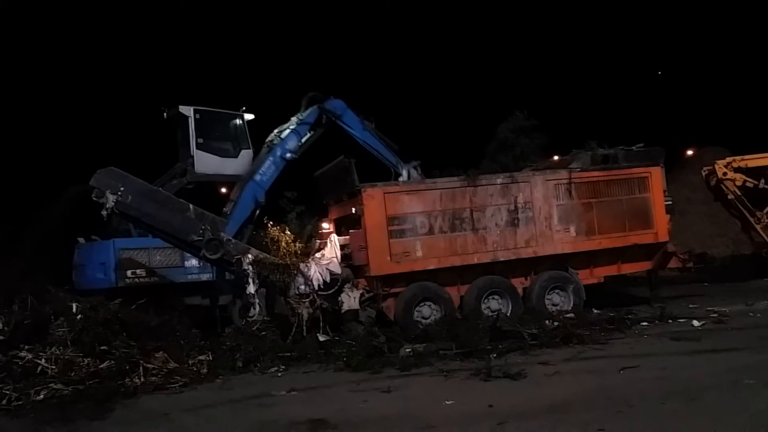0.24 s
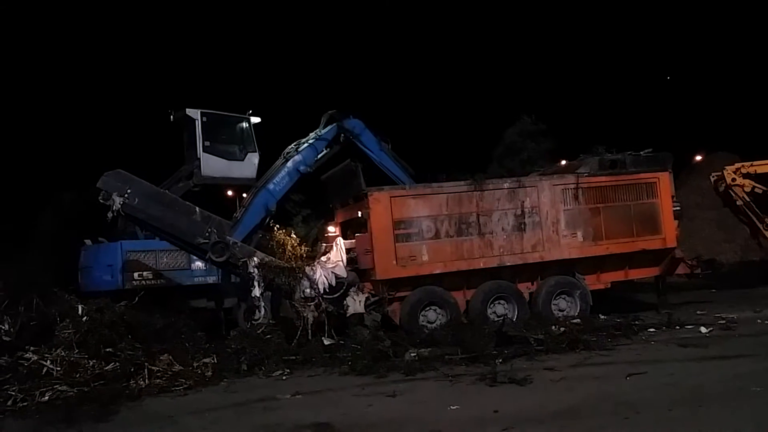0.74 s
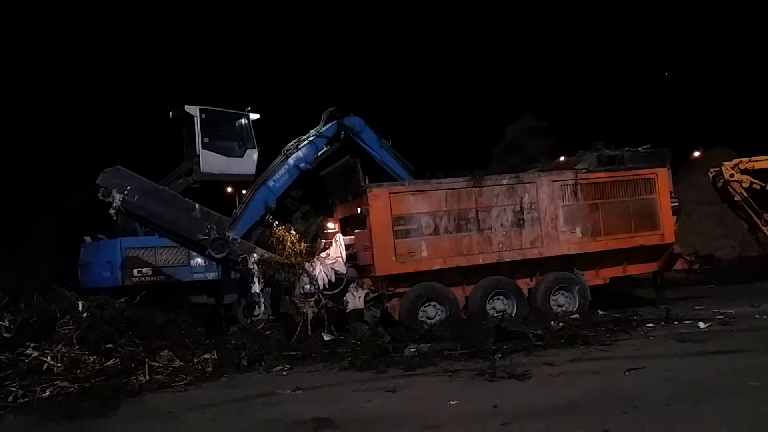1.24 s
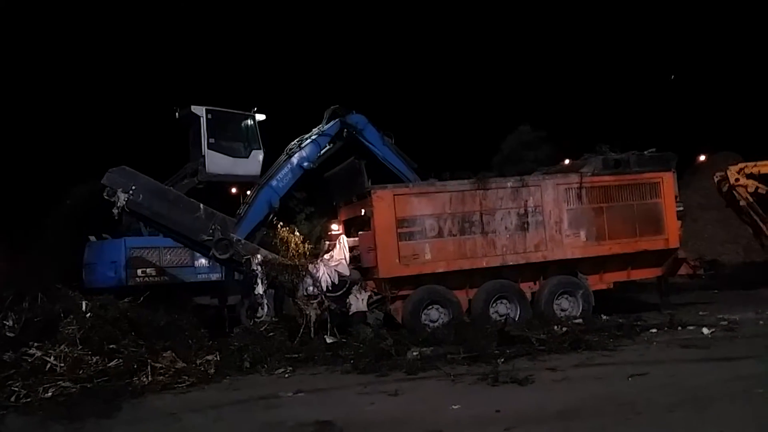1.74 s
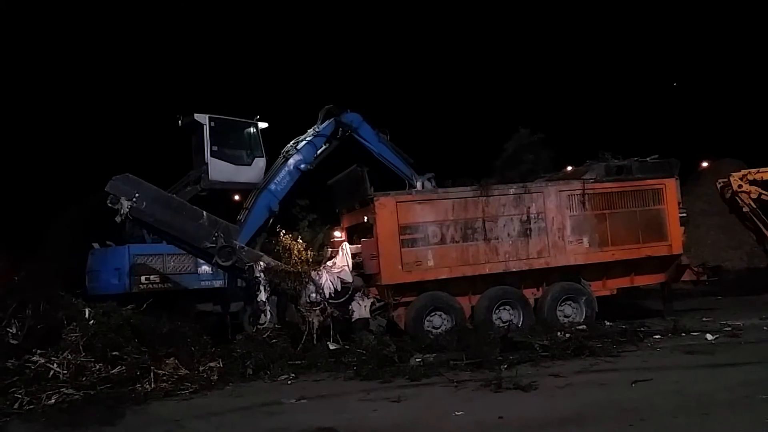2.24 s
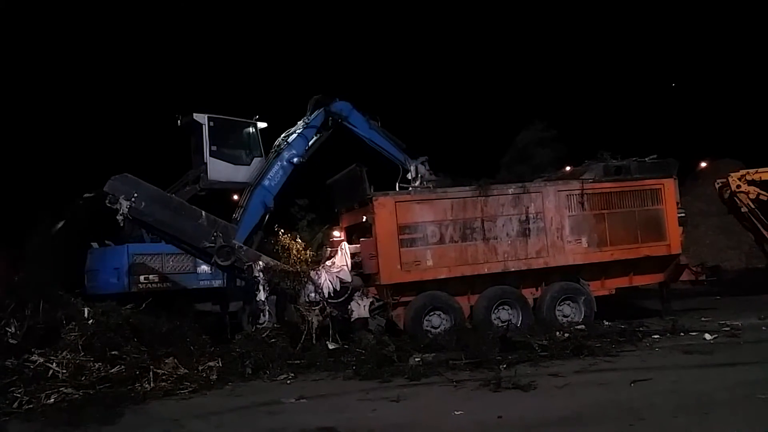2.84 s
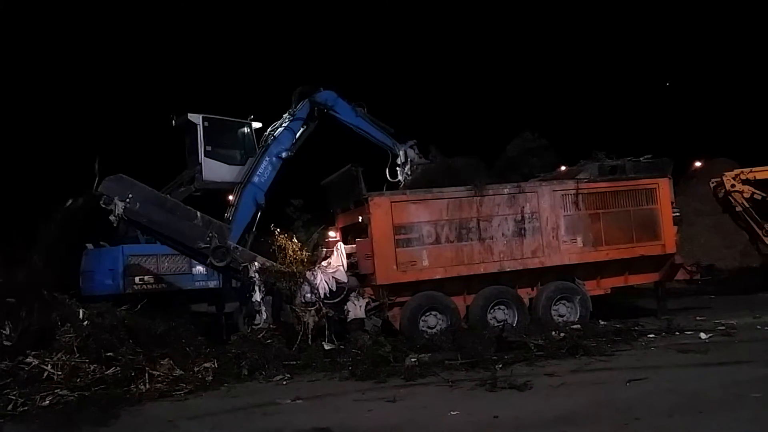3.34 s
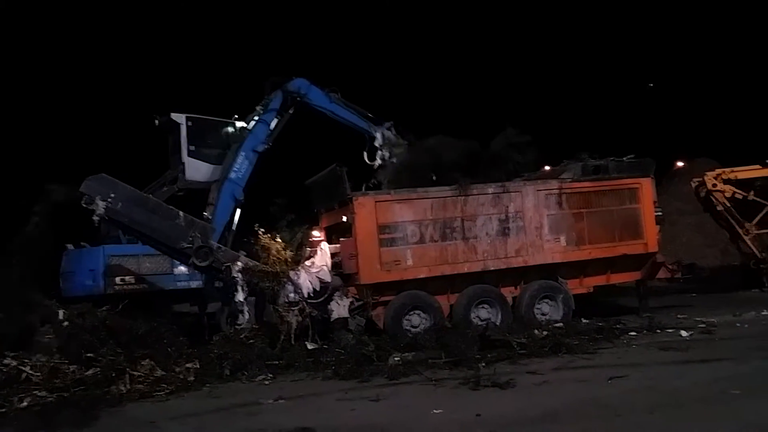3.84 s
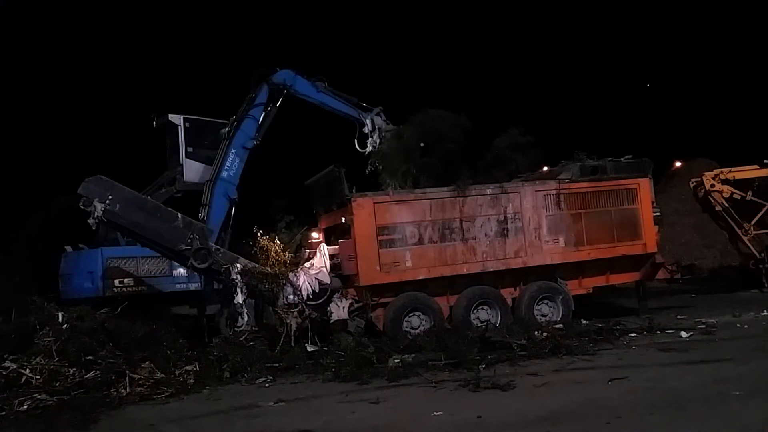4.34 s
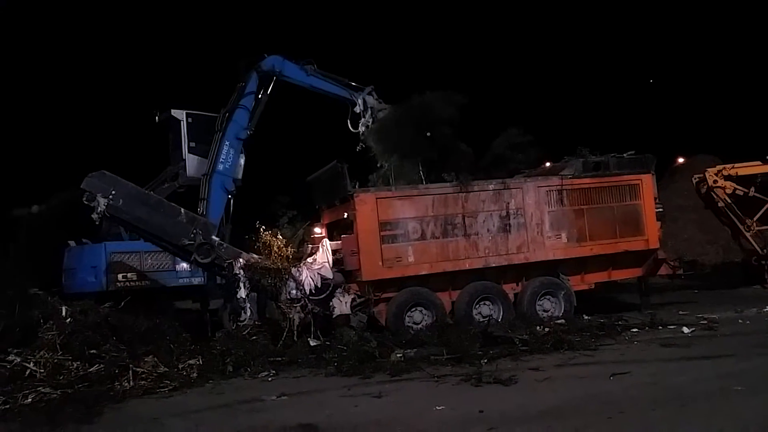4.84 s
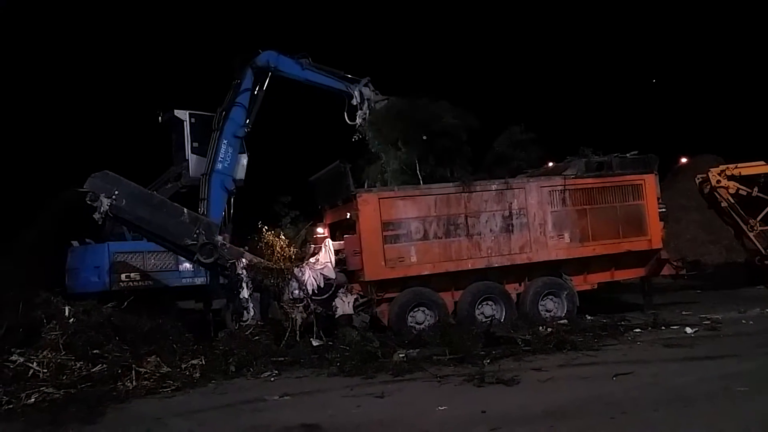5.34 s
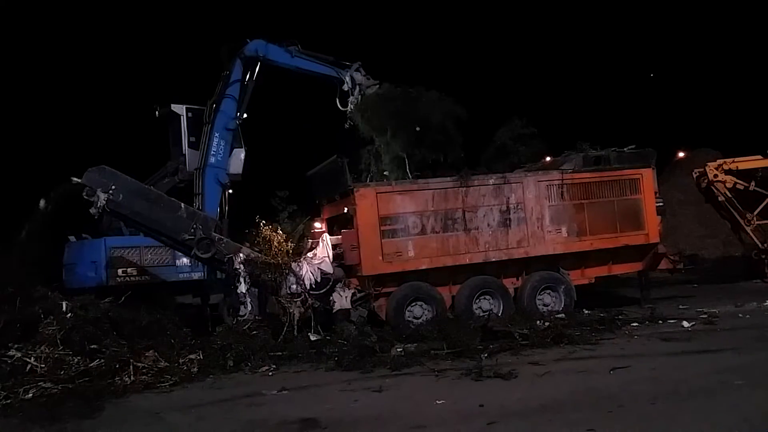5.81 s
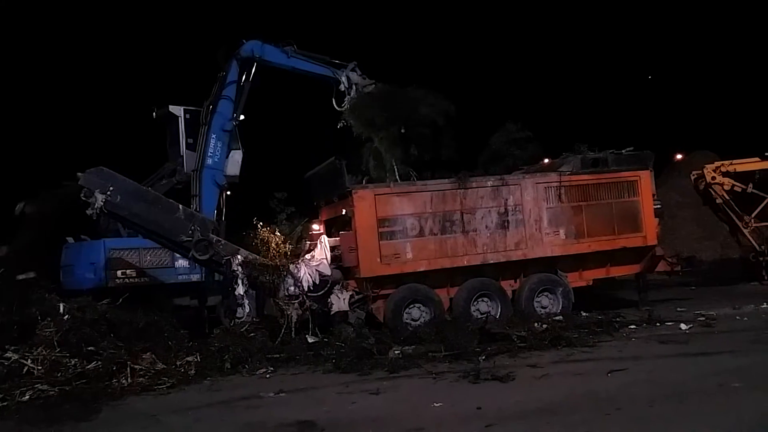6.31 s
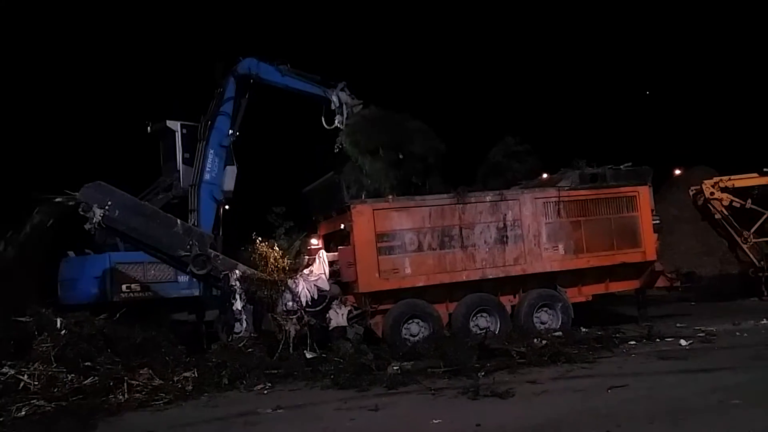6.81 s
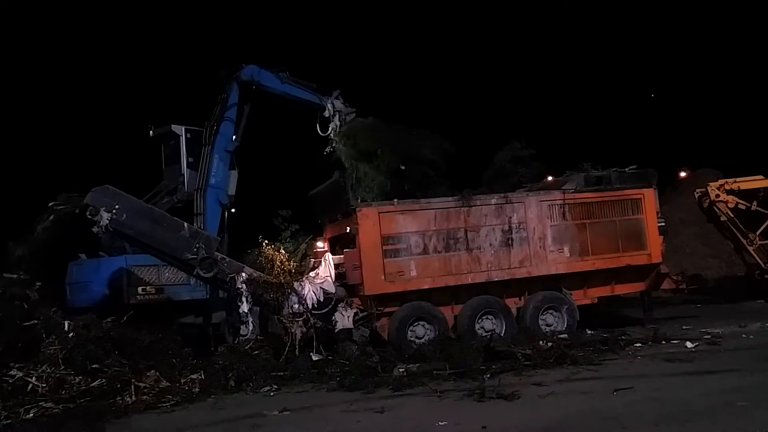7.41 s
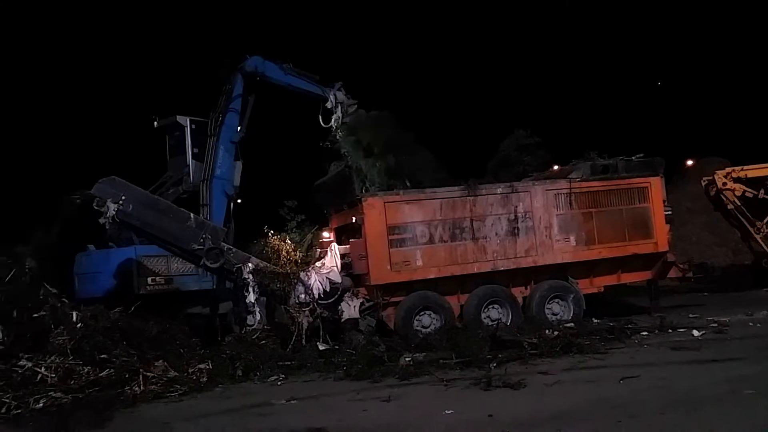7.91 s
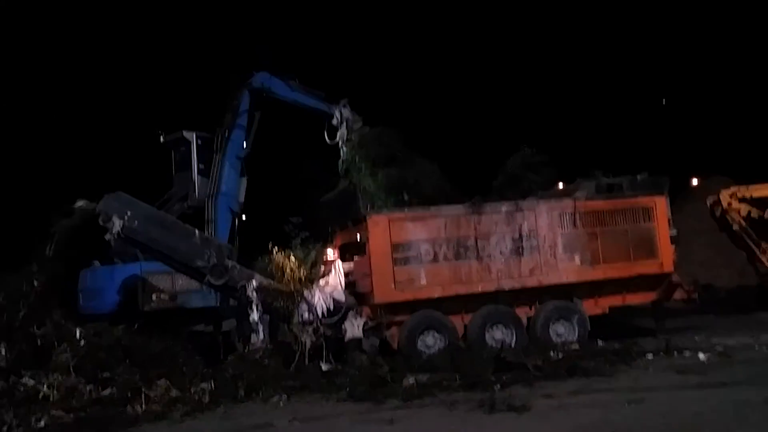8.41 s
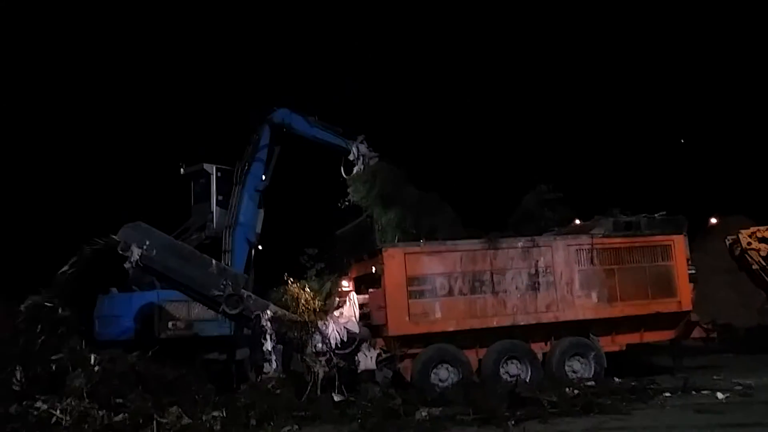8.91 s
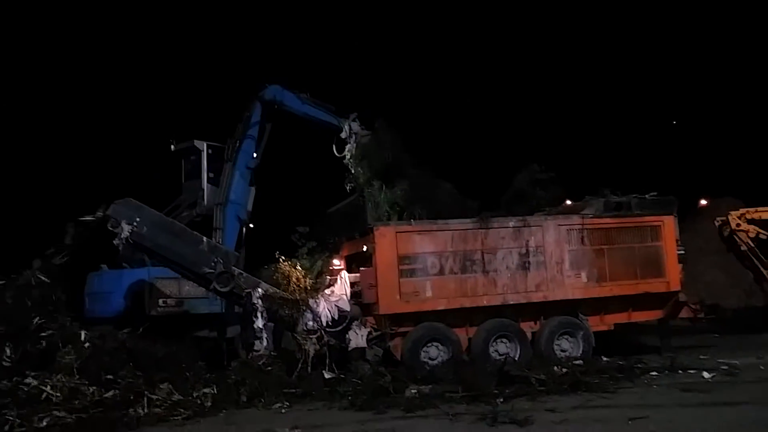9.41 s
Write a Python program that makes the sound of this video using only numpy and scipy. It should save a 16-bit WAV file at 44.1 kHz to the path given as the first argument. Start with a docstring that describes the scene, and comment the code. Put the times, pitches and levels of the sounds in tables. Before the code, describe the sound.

Steady heavy diesel drone with rattling steel, dull branch thuds, a rising and falling turbo whistle and snatches of squeaky hydraulic whine outdoors.

```python
"""A six-cylinder diesel shredder drones and clatters in an open yard, a loader's steady low tones further off.
A first branch thuds in the hopper; near 2 s the engine sags under load as two more land, the turbocharger
whistles upward until about 3 s, then sinks as the engine picks up. A last thud follows before 5 s.
Throughout, noise pulses with the firing and a geared hydraulic pump whines in snatches and squeaks.
The camera's left microphone port is covered: it hears the bass, late, and hardly any treble."""
import sys
import numpy as np
from scipy import signal
from scipy.fft import rfft, irfft, next_fast_len
from scipy.io import wavfile
from scipy.ndimage import uniform_filter1d, map_coordinates

SR = 44100
rng = np.random.default_rng(int(sys.argv[2]) if len(sys.argv) > 2 else 0)


def wav_record(signal):
    """Record a signal, one row per channel, as 16-bit PCM in the file named by sys.argv[1]."""
    frames = np.transpose(np.atleast_2d(signal))
    bounded = np.clip(frames, -1, 1)
    # unit amplitude maps onto the largest positive 16-bit level
    quanta = np.round(bounded * 32767).astype(np.int16)
    wavfile.write(sys.argv[1], SR, quanta)


N = 426006

# shredder engine: start_s, firing_hz, exhaust_tone_db, its_octave_db
ENGINE = [(0.05, 99, -21.5, -35), (.4, 100, -20.5, -31), (.85, 100.3, -19.5, -29.5),
          (1.2, 101.1, -19.5, -29.5), (1.45, 100, -20.5, -29.5), (1.6, 99, -21, -30),
          (1.75, 96.3, -23, -28), (1.88, 95.1, -25.5, -25.5), (2.02, 94.7, -22, -26),
          (2.35, 95.4, -21.5, -26), (2.65, 97.7, -23.5, -27.5), (2.8, 98.3, -23, -27),
          (3.25, 102.6, -21, -26.5), (3.45, 102.3, -20.5, -31), (3.75, 103.8, -22, -33),
          (4.15, 102.5, -20.5, -32), (4.5, 102, -19.5, -29.5), (4.75, 101.3, -19.5, -30.5),
          (5.3, 101.6, -20.5, -26.5), (5.7, 100.8, -20.5, -27.5), (6.1, 98.9, -20, -32),
          (6.3, 99.4, -20.5, -31), (6.8, 99.1, -20.5, -31.5), (7.4, 99.3, -20, -33),
          (7.7, 100.2, -19.5, -31.5), (8.35, 101.1, -18.5, -30), (9.25, 101.1, -19.5, -29.5),
          (9.61, 100.6, -20.5, -27)]
GOVERNED_HZ = 100  # firing rate from which sag is counted


def amp(db):
    """Decibels to an amplitude factor."""
    return 10 ** (np.asarray(db) / 20)


def unit(x):
    """x scaled to rms 1."""
    return x / np.sqrt(np.mean(x ** 2) + 1e-20)


def along(points, hz):
    """Each column after the Hz column, read on a log frequency axis."""
    f, *columns = np.transpose(points)
    return np.squeeze([np.interp(np.log(hz + 1), np.log(f + 1), c) for c in columns])


def curves(rows):
    """One value per sample for each column after the time."""
    s, *columns = np.transpose(rows)
    return [np.interp(np.arange(N) / SR, s, c) for c in columns]


def wobble(rate):
    """A smooth random curve, rate knots a second."""
    knots = rng.standard_normal(int(N * rate / SR) + 4)
    return map_coordinates(knots, [np.arange(N) * rate / SR])


def filtered(x, response):
    """x times a complex response of frequency."""
    m = next_fast_len(N + SR // 2)
    return irfft(rfft(x, m) * response(np.fft.rfftfreq(m, 1 / SR)), m)[..., :N]


def modes(table):
    """The response of a few resonances, narrow or broad, neighbours opposite in sign."""
    def response(f):
        total = 0
        for k, (centre, width, db) in enumerate(table):
            damping = 1j * f * width
            total = total + (-1) ** k * amp(db) * damping / (centre * centre - f * f + damping)
        return total
    return response


def turns(hz):
    """Running phase in radians of a frequency curve."""
    return 2 * np.pi * np.cumsum(hz) / SR


def tone(phase, db, waver_db, blur, rate, locked=False):
    """A sine about rms level db, wandering in strength and phase (blur, radians); locked ones start in a trough."""
    start = -np.pi / 2 if locked else rng.uniform(0, 2 * np.pi)
    strength = np.sqrt(2) * amp(db + waver_db * wobble(rate))
    return strength * np.sin(phase + start + blur * wobble(rate))


def rush(spectrum, beat, patchy_db):
    """Stereo noise of rms 1, pulsed by beat, with patches of random gain in time and frequency."""
    # how alike left and right are: pitch_hz, likeness (0 to 1)
    alike = [(30, .97), (100, 0.95), (350, 0.92), (500, 1), (750, 0.81), (1100, 0.9), (1400, 0.88),
             (1700, 0.89), (2150, 0.67), (2900, 0.71), (3700, 0.69), (4200, 0.16), (15000, .2)]
    z = signal.stft(rng.standard_normal((2, N)), nperseg=512)[2]
    patches = uniform_filter1d(rng.standard_normal(z.shape[1:]), size=8, axis=0)
    patches = uniform_filter1d(patches, size=8, axis=1)
    patchy = signal.istft(z * amp(patchy_db * unit(patches)), nperseg=512)[1][:, :N]

    def mid_side_gains(hz):
        turn = np.arccos(np.clip(along(alike, hz), 0, 1)) / 2
        return amp(along(spectrum, hz)) * [np.cos(turn), np.sin(turn)]

    mid, side = filtered(beat * patchy, mid_side_gains)
    return unit(np.array([mid + side, mid - side]))


def loader():
    """A second diesel further off: low tones at steady pitch, wandering a little in strength and phase."""
    # pitch_hz, level_db
    steady_tones = [(58, -50), (77, -39)]
    return sum(tone(turns(np.full(N, hz)), db, waver_db=2.5, blur=.9, rate=3) for hz, db in steady_tones)


def thuds():
    """Branches in the hopper: dull, splintery noise bursts ringing in its steel walls."""
    # start_s, level_db, fall_by_60_db_s
    branches = [(.364, -20.5, .3), (2.032, -24, .25), (2.319, -23, .22), (4.745, -20, .24)]
    # resonances of the hopper walls: pitch_hz, width_hz, relative_db
    walls = [(1030, 140, 0), (1150, 160, -3), (1500, 400, -10), (2000, 500, -6)]
    shake, t = np.zeros(N + SR), np.arange(SR // 2) / SR
    for s, db, t60 in branches:
        onset = 1 - np.exp(-t / .004)
        shake[round(s * SR):][:len(t)] += amp(db - 60 * t / t60) * onset
    splinters = rng.standard_normal(N) * amp(2 * wobble(120))
    return shake[:N] * unit(filtered(splinters, modes(walls)))


def turbo():
    """Two blade rows on one shaft whistle at seven and five times its speed, breathy and breaking up."""
    # upper whistle: start_s, pitch_hz, level_db
    whistle = [(0, 8100, -46), (.25, 8300, -46), (.6, 8230, -53), (1.4, 8000, -60), (1.65, 8200, -48),
               (2.2, 9520, -48), (2.8, 10730, -48), (3.15, 11200, -51), (3.3, 10980, -58),
               (3.42, 10750, -50.5), (3.8, 10050, -50.5), (4.15, 9250, -53), (4.35, 8800, -64),
               (5.1, 8100, -60), (5.7, 7550, -51), (6.8, 7850, -49), (7.4, 8050, -47), (7.8, 8000, -53),
               (8.6, 7800, -54), (9.1, 7450, -45), (9.66, 7150, -43)]
    # air drawn in: pitch_hz, relative_db_per_hz
    intake = [(5000, -32), (8000, 1), (10500, -7), (15400, -10)]
    lower_over_db, coasting_db = 8.5, 1.5  # lower whistle over upper; louder per kHz/s of slowing
    wakes_hz, wakes_over_hz = 8100, 300  # lower one fades in over this range of the upper whistle's pitch
    hz, upper_db = curves(whistle)
    hz = uniform_filter1d(hz, size=SR // 5, mode="nearest")  # the rotor is too heavy for sudden changes
    spin = turns(hz)
    upper = tone(spin, upper_db + 1.4 * wobble(9), waver_db=3.5, blur=1.8, rate=480)

    boost = np.clip((hz - wakes_hz) / wakes_over_hz, 0, 1)
    rise_khz_per_s = np.gradient(hz) * SR / 1000
    lower_db = upper_db + lower_over_db - coasting_db * rise_khz_per_s + 2 * wobble(11)
    lower = boost * tone(spin * 5 / 7, lower_db, waver_db=3.5, blur=1.45, rate=170)

    air = (hz / hz.max()) ** 3.1  # more speed, more air
    hiss = amp(-40) * air * rush(intake, 1, patchy_db=3.5)
    return upper + lower + hiss


def pump():
    """Geared to the engine; piston-rate overtones flicker with the oil pressure and sometimes flare into squeaks."""
    # whine level and strokes per firing, each drifting over time: start_s, level_db, piston_strokes_per_firing
    whine = [(0, -43, 9.58), (.9, -47, 9.58), (1.3, -44, 9.54), (1.55, -40, 9.54), (1.75, -43, 9.44),
             (2, -42.5, 9.5), (2.35, -45, 9.48), (2.7, -40.5, 9.52), (3.05, -41, 9.5), (3.3, -43, 9.56),
             (4.1, -44, 9.55), (4.6, -46, 9.55), (5.4, -52, 9.55), (5.8, -41, 9.52), (6.15, -44, 9.58),
             (6.45, -42, 9.57), (6.8, -43, 9.58), (7.2, -42, 9.58), (7.7, -45, 9.52), (8.3, -50, 9.52),
             (9.66, -52, 9.52)]
    # overtone, relative_db, gain_db_per_hz_of_sag, share_of_the_whine's_swing
    pistons = [(1, -6, -1, .3), (4, -4, -1, .6), (5, -.5, .9, 1), (6, -3.5, -.2, 1), (7, -9, 1.3, .8)]
    # one overtone flares: middle_s, overtone, peak_db, length_s
    squeaks = [(0.0, 5, -30, 0.08), (0.667, 6, -35, 0.09), (1.306, 6, -34.5, 0.08), (1.524, 6, -29, 0.07),
               (1.565, 5, -30, 0.13), (1.93, 5, -35, .16), (2.1, 5, -34.5, 0.14), (2.53, 5, -33, .1),
               (2.68, 5, -31, 0.22), (2.81, 5, -34, .1), (2.97, 5, -35, .16), (3.007, 6, -31, 0.1),
               (3.285, 6, -33, 0.1), (3.3, 5, -36, .1), (3.8, 1, -34.5, .25), (4.52, 6, -35, 0.14),
               (5.76, 6, -34, 0.2), (5.865, 5, -32, 0.16), (6.47, 6, -33, 0.2), (6.571, 5, -33, 0.15),
               (6.78, 5, -36, .2), (6.82, 6, -35, .16), (7.03, 6, -35, .12), (7.11, 6, -31, 0.1),
               (7.14, 5, -33, 0.17), (7.37, 5, -35, .12), (7.4, 6, -36, 0.14), (7.82, 6, -36, 0.16)]
    firing_hz, *_ = curves(ENGINE)
    whine_db, gearing = curves(whine)
    stroke, t = turns(gearing * firing_hz), np.arange(N) / SR
    mean_db = whine_db.mean()
    out = np.zeros(N)
    for k, db, sag_db, share in pistons:
        level_db = db + sag_db * (GOVERNED_HZ - firing_hz) + mean_db + share * (whine_db - mean_db)
        power = amp(level_db + 1.8 * wobble(16)) ** 2
        flares = np.zeros(N)
        for s, overtone, peak_db, length in squeaks:
            if overtone == k:
                flares += amp(peak_db) ** 2 * np.exp(-(3.1 * (t - s) / length) ** 2)
        power += amp(1.6 * wobble(45)) ** 2 * flares
        out += np.sqrt(power) * tone(k * stroke, 0, waver_db=3, blur=.17 * k, rate=110)
    return out


def exhaust_tones(firing_hz, tone_db, octave_db):
    """The firing rate, its octave and other sixths of it: six unlike cylinders make one cycle."""
    # strong overtones: sixth, level_db, gain_db_per_hz_of_sag, waver_db
    overtones = [(16, -37, 0, 1.5), (18, -35.5, .6, 2)]
    # from unlike cylinders: sixth_of_the_firing_rate, level_db
    sixths = [(7, -44), (8, -45), (9, -45), (10, -39), (14, -36), (17, -39.5), (19, -46), (21, -41.5),
              (22, -46), (24, -41.5), (26, -46), (29, -50), (33, -48), (36, -46), (38, -44), (40, -43),
              (42, -41)]
    firing = turns(firing_hz)
    tones = tone(firing, tone_db, waver_db=.17, blur=.054, rate=9.9, locked=True)
    tones += tone(2 * firing, octave_db, waver_db=1.5, blur=.25, rate=7, locked=True)
    for sixth, db, sag_db, waver_db in overtones:
        level_db = db + sag_db * (GOVERNED_HZ - firing_hz)
        tones += tone(firing * sixth / 6, level_db, waver_db, blur=.3, rate=5, locked=True)
    for sixth, db in sixths:
        tones += tone(firing * sixth / 6, db, waver_db=2.8, blur=.3, rate=3)
    return tones


def shredder_engine():
    """Exhaust tones, panel growl and fan follow the firing rate; roar and steel clatter pulse with it."""
    # sheet panels round the engine: pitch_hz, width_hz, relative_db
    hood = [(706, 12, -6), (742, 13, 1), (784, 15, 3), (823, 12, 0), (872, 16, -2), (908, 16, -2),
            (958, 16, -4)]
    # higher sixths, loudest where they cross a panel's resonance: sixth, level_db_before_the_panels
    growling = [(44, -35.5), (45, -35), (46, -33), (47, -35), (48, -44), (49, -33.5), (52, -35), (53, -37),
                (54, -34), (55, -42), (56, -41), (57, -35)]
    # roar: pitch_hz, relative_db_per_hz
    roar_spectrum = [(30, -25), (50, -11.5), (70, -2.5), (120, -3), (200, 1), (300, -4), (400, -4.5),
                     (500, -12), (600, -6), (780, -1.5), (950, -5), (1080, -11), (1400, -15.5), (2200, -47)]
    # clatter of steel: pitch_hz, relative_db_per_hz
    clatter_spectrum = [(900, -20), (1400, -5.5), (1950, 3), (2400, -2), (3400, -6.5), (3850, -8.5),
                        (4700, -4.5), (5400, -7.5), (6000, -6), (6700, -8), (8000, -17.5), (9000, -22),
                        (12000, -22.5), (15400, -30.5)]
    # level of the clatter: start_s, level_db
    grinding = [(0, -23.5), (1.3, -24), (2.4, -22.5), (3.7, -23), (4.8, -23.5), (6.5, -23.5), (8, -24.5),
                (9.66, -23.5)]
    firing_hz, tone_db, octave_db = curves(ENGINE)
    clatter_db, = curves(grinding)
    firing = turns(firing_hz)
    tones = exhaust_tones(firing_hz, tone_db, octave_db)

    fade_db = -.8 * np.clip(GOVERNED_HZ - firing_hz, 0, None)  # the growl fades per Hz of sag
    growl = np.zeros(N)
    for sixth, db in growling:
        growl += tone(firing * sixth / 6, db + fade_db, waver_db=1.5, blur=.3, rate=2.5)
    tones += filtered(growl, modes(hood))
    tones += tone(2.18 * firing, -34.5, waver_db=3.5, blur=1.3, rate=8)  # the cooling fan's fuzzy blade tone

    uneven = sum(np.cos(firing * k / 6) for k in (1, 2, 3, 4))  # one cylinder barks louder, once a cycle
    roar_pulse = 1 + .03 * np.cos(firing) + .022 * uneven
    roar_flutter = amp(.96 * wobble(45) + .091 * wobble(2.83))
    roar = rush(roar_spectrum, roar_pulse * roar_flutter, patchy_db=.5)
    panel_noise = filtered(rng.standard_normal(N) * (1 + .15 * uneven), modes(hood))
    panels = amp(-15 + 1.5 * wobble(2.5)) * unit(panel_noise)  # dB relative to the roar

    knock = 1 + .07 * np.cos(firing) + .065 * np.cos(2 * firing)
    knock += .05 * np.cos(firing / 3) + .03 * np.cos(firing / 2) + .035 * np.cos(firing * 2 / 3)
    # loose steel rattles all the treble together, in part at the pace of a belt-driven shaft
    shaft = np.cos(.226 * firing + wobble(3.14))
    rattle = amp(.14 * wobble(4.3) + .52 * wobble(48) + .78 * wobble(95) + .68 * shaft)
    clatter = rush(clatter_spectrum, knock * rattle, patchy_db=.67)
    return tones + amp(-22) * (roar + panels) + amp(clatter_db) * clatter


def scene():
    """The yard from the far loader to the shredder's engine."""
    return loader() + thuds() + turbo() + pump() + shredder_engine()


def ports(hz):
    """Gain of each microphone port; the covered left one is dulled and lags."""
    # pitch_hz, left_db, right_db
    port_gains = [(60, -0.5, -0.34), (418, -2, -0.2), (790, -3.5, -1.5), (1164, -3, 3.5), (1400, -8, 2.5),
                  (1570, 0, 1.5), (2170, -5.5, -0.5), (2550, 1.5, 1.5), (2900, 2.5, 3.5), (3340, -5, 3),
                  (3930, -11, 10), (4220, -29.5, 6.5), (7150, -21, 7), (15000, -19.5, 3.5)]
    # how far the left port lags: pitch_hz, lag_radians
    left_lag = [(60, .03), (200, .15), (400, .3), (800, .58), (1150, .9), (1500, .12), (2050, 1),
                (2250, .33), (2700, 1.5), (3500, 3.1), (4100, 4), (4500, 8), (15000, 8.3)]
    left_db, right_db = along(port_gains, hz)
    return np.array([amp(left_db) * np.exp(-1j * along(left_lag, hz)), amp(right_db)])


def record(dry):
    """The two ports, a preamplifier that rounds off the highest peaks; nothing is heard above top_hz."""
    top_hz = 15450
    x = filtered(dry, ports)
    x = x / (1 + np.abs(x / .8) ** 5) ** (1 / 5)
    return filtered(x, lambda hz: hz < top_hz)


dry = scene()
out = record(dry)
wav_record(out)
```